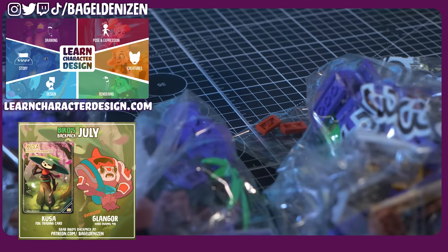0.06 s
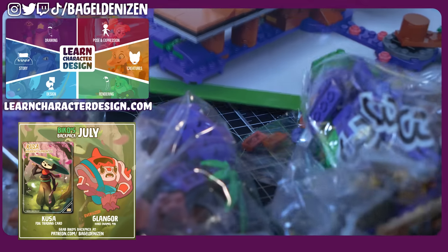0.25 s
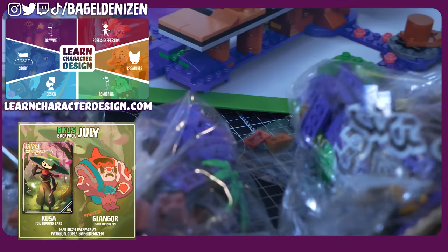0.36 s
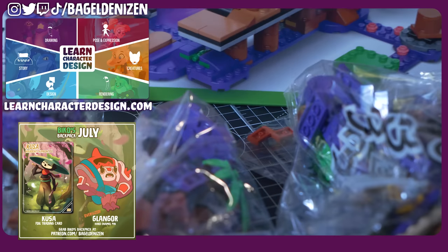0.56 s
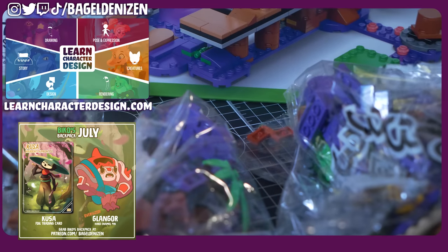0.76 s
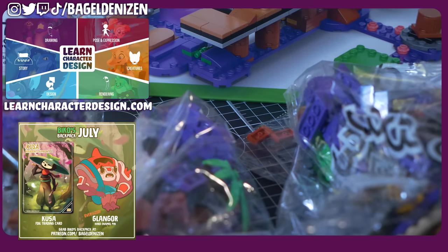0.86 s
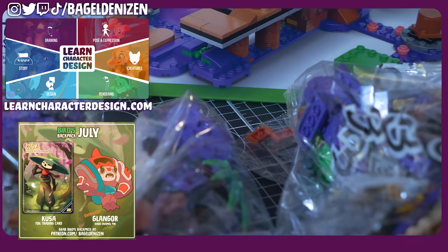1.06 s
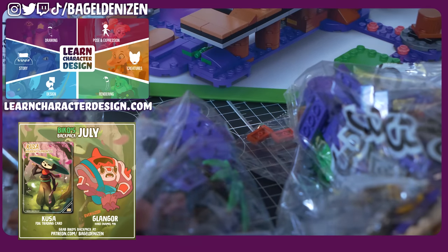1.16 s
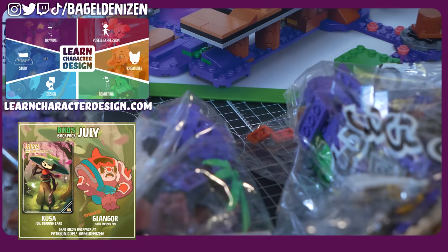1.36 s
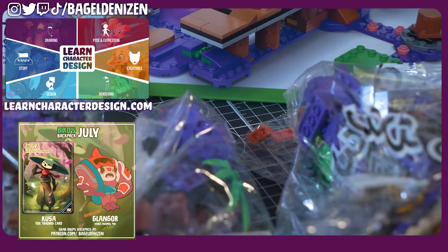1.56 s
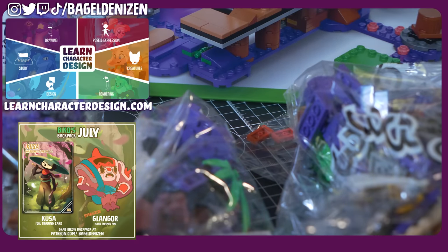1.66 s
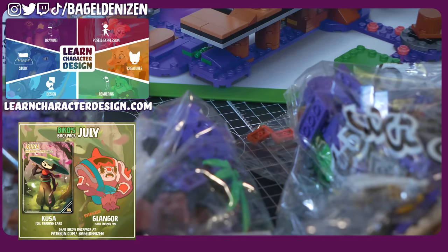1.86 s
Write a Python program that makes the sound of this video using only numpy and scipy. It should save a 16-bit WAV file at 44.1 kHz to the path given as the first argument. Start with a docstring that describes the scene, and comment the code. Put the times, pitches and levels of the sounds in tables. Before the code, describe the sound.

A sealed bag of plastic toy bricks drops on a table, close in a small room. Faint cloth rustle leads to a loud, slightly overloaded double thump and clatter at 0.23 seconds. Crinkles and clicks thin out, then the bag slumps softly around 0.6 and crisply at 0.82. Faint lone ticks at 1.14, 1.22 and 1.5 precede soft rustling and small ticks from 1.8.

```python
"""Close stereo microphone in a small room: hands and cloth rustle softly, then a sealed plastic bag of toy bricks
drops on a table. The top booms as pushes and knocks ring its modes; the film crinkles as a hail of noise cracks,
and bricks and film click as single cracks through ringing colours. The bag slumps twice and settles with lone
two-ringed ticks until a hand takes hold again. Room tone is steady coloured noise; loud peaks overload softly."""
import sys
import numpy as np
from scipy import signal
from scipy.fft import rfft, irfft
from scipy.io import wavfile
from scipy.ndimage import uniform_filter1d

SR = 44100
rng = np.random.default_rng(int(sys.argv[2]) if len(sys.argv) > 2 else 0)


def generate_wav(sig):
    """Save sig (samples, or channels by samples) to the path in sys.argv[1] as 16-bit PCM at SR."""
    pcm = np.round(np.clip(np.atleast_2d(sig).T, -1, 1) * 32767).astype(np.int16)
    wavfile.write(sys.argv[1], SR, pcm)


def level_to_linear(level):
    """Convert decibel levels to linear amplitude factors, elementwise."""
    exponent = np.asarray(level, float) / 20
    return 10 ** exponent


N = 83790  # samples, 1.9 s

# room tone: pitch_hz, relative density_db (per Hz)
AIR_COLOUR = [(40, -25.5), (160, -2), (1550, -1.5), (2200, -14.5), (3700, -14), (16000, -16.5)]
AIR_DB = -65
# strength of hands and cloth nearby: time_s, relative level_db
RUSTLE = [(0, -58), (.1, -54), (.2, -58), (1.45, -72), (1.6, -60), (1.76, -53.5), (1.9, -47)]
# colour of that rustle: pitch_hz, relative density_db (per Hz)
RUSTLE_COLOUR = [(60, -38.5), (250, -6.5), (1100, -1.5), (2500, -10.5), (5000, -19.5), (16000, -36)]
# decay of the small room: pitch_hz, t60_s
ROOM_DECAY = [(300, 0.26), (5000, 0.49), (14000, 0.12)]
ROOM_DB, ROOM_SIDE_DB, ROOM_RISE_S = -8.5, -8.5, 0.0073
WIDE_HZ, WIDE_DB = 10500, 8.5  # above this the two capsules hear the room differently
# where the bag and rustle sit: time_s, left_minus_right_db
PLACE = [(0, -6.5), (.2, -0.5), (1, -3.5)]
TABLE_PLACE_DB = 1.5  # left minus right
# modes of the table top: pitch_hz, relative level_db
TABLE_MODES = [(167, -17), (243, -4.5), (312, 2), (387, -2), (533, 0.5), (577, 3), (634, 5), (933, -7.5),
               (1045, -0.5), (1335, 1.5)]
TABLE_T60_S = 0.047  # at 500 Hz
# bag and heavy clumps landing: time_s, relative level_db, favoured_mode_hz
BLOWS = [(0.229, 6.5, 690), (0.242, 9.5, 440), (0.278, -5.5, 600), (0.333, -5, 600), (0.63, -27.5, 318),
         (0.654, -13.5, 235), (0.685, -18.5, 450), (0.722, -25, 570), (1.137, -42, 601),
         (1.593, -50.5, 400)]
BLOW_DB = -5.5  # added to every blow
CONTACT_S, SPOT_DB = 0.00028, -11.5  # width of the push; loss one octave from the favoured modes
# how hard the bag moves: time_s, relative crinkle_db, relative tumbling_db
MOTION = [(.216, -67, -54), (.22, -29.5, -11), (.24, -16, 0), (.28, -27.5, -16), (.34, -37, -30),
          (.52, -46, -39.5), (.578, -43.5, -37.5), (.59, -35, -47), (.65, -38.5, -46), (.74, -50.5, -40.5),
          (.812, -49, -56.5), (.825, -30.5, -49), (.885, -36.5, -48.5), (.91, -80, -64.5),
          (1.134, -93, -81), (1.142, -60, -58), (1.2, -80, -86), (1.833, -70.5, -70.5), (1.842, -42.5, -66),
          (1.9, -57, -50)]
TUMBLE_DB, TUMBLE_SCATTER_DB = 2.5, 3
CRINKLE_DB, CRINKLE_SCATTER_DB = 3, 4
# colour of the rings of bricks and film: pitch_hz, relative level_db
PLASTIC = [(400, -17), (1300, 0.5), (4000, -5.5), (7000, -6), (10000, -4), (14000, -8.5), (16500, -31)]
# clear clicks of bricks and snaps of film: start_s, relative level_db, strongest_ring_hz
CLICKS = [(0.23, -7, 4000), (0.268, 2.5, 2950), (.376, -11, 5100), (.4004, -13, 2090), (0.4704, -19, 11900),
          (0.5273, -19, 7000), (0.5599, -15.5, 3600), (0.5832, -5.5, 4100), (0.5933, -12, 9500),
          (0.604, -12.5, 4870), (0.613, -20, 8000), (0.6367, -16.5, 5670), (0.6436, -21.5, 8850),
          (0.6886, -15.5, 5070), (0.7473, -20.5, 8640), (0.7601, -14, 1694), (0.7715, -16, 5840),
          (.819, -10, 4540), (0.8314, -11, 9450), (.856, -12, 3580), (0.8619, -12, 4430),
          (0.8787, -15, 8550), (0.8912, -15.5, 4150), (1, -34.5, 1875), (1.7305, -41.5, 4540)]
CLICK_DB, CLICK_MS, CLICK_RING_DB = -4.5, 0.98, 11.5
# duller ticks of single bricks: start_s, relative level_db, low_ring_hz, high_ring_hz, slope_db_per_octave (3-12 kHz)
TICKS = [(0.137, -36.5, 1763, 2292, -11), (1.137, -25, 1220, 2250, -2), (1.219, -29.5, 1221, 2700, -13),
         (1.2364, -48.5, 1250, 2550, -11), (1.522, -27, 1446, 9790, -11.5),
         (1.8364, -25.5, 1494, 2550, -15), (1.8402, -19, 1890, 2582, -5),
         (1.8459, -24.5, 1660, 2478, -11.5), (1.864, -23.5, 3008, 4380, -11)]
TICK_DB, TICK_MS, TICK_RING_DB, TICK_OCTAVES = -5, 1, 12.5, 0.12
# upper rings that all ticking bricks share: pitch_hz
BRICK_HZ = [3620, 5040, 7000]
BRICK_DB = 7.5
SIZE = 512  # samples in one crack
GRID = np.fft.rfftfreq(SIZE, 1 / SR) + 1  # Hz, kept above zero for logarithms


def curve(rows, col, t):
    """Straight lines between the rows of a table."""
    rows = np.array(rows, float)
    return np.interp(t, rows[:, 0], rows[:, col])


def tone(rows, hz):
    """Value of a spectrum, straight on a log frequency axis."""
    rows = np.array(rows, float)
    return np.interp(np.log(np.maximum(hz, 1)), np.log(rows[:, 0]), rows[:, 1])


def set_rms(x, db):
    """Scale to a given rms."""
    return x * level_to_linear(db) / np.sqrt(np.mean(x ** 2))


def noise(colour):
    """Steady noise of a given colour, rms 1."""
    spectrum = rfft(rng.standard_normal(N))
    weight = level_to_linear(tone(colour, np.fft.rfftfreq(N, 1 / SR)))
    return set_rms(irfft(spectrum * weight, N), 0)


def wide_noise(colour, side_gain):
    """Noise common to both channels plus a weaker part of opposite sign in each."""
    return noise(colour) + side_gain * noise(colour) * np.array([[1], [-1]])


def pan(x, db):
    """Place a sound by the level difference between the channels."""
    return np.array([x * level_to_linear(db / 2), x * level_to_linear(-db / 2)])


def air():
    """Room tone: steady, fairly wide coloured noise."""
    return level_to_linear(AIR_DB) * wide_noise(AIR_COLOUR, 0.5)


def rustle(t, place):
    """Hands and cloth rub softly: coloured noise that swells with their strength."""
    return level_to_linear(curve(RUSTLE, 1, t)) * wide_noise(RUSTLE_COLOUR, 0.25) * pan(0.91, place)


def room(x):
    """Reflections as noise decaying octave by octave, mostly alike in both channels."""
    t = np.arange(SR // 2) / SR
    tail = 0
    for hz in 125 * 2. ** np.arange(8):
        edges = [hz / 2 ** .5, min(hz * 2 ** .5, SR * .45)]
        octave = signal.butter(2, edges, "band", fs=SR, output="sos")
        decay = np.exp(-np.log(1000) * t / tone(ROOM_DECAY, hz))
        tail = tail + signal.sosfilt(octave, rng.standard_normal((2, len(t)))) * decay
    tail = tail * np.clip(t / ROOM_RISE_S, 0, 1)
    tail = tail / np.sqrt(np.sum(tail[0] ** 2))
    mid, side = signal.fftconvolve(x[None], tail, axes=1)[:, :N]
    treble = signal.butter(4, WIDE_HZ, "high", fs=SR, output="sos")
    side = side + level_to_linear(WIDE_DB) * signal.sosfilt(treble, side)
    return level_to_linear(ROOM_DB) * (mid + level_to_linear(ROOM_SIDE_DB) * side * np.array([[1], [-1]]))


def table_modes(force):
    """Damped resonances of the table top, each driven by its own row of force."""
    out = 0
    for (hz, db), mode_force in zip(TABLE_MODES, force):
        t60_s = TABLE_T60_S * (500 / hz) ** 0.73  # higher modes die sooner
        radius = np.exp(-np.log(1000) / (t60_s * SR))
        angle = 2 * np.pi * hz / SR
        poles = [1, -2 * radius * np.cos(angle), radius ** 2]
        out = out + level_to_linear(db) * signal.lfilter([.5, 0, -.5], poles, mode_force)
    return out


def blows(t):
    """The bag and heavy clumps land as soft pushes, favouring the modes of the spot they hit."""
    force = np.zeros((len(TABLE_MODES), N))
    polarity = (-1) ** np.arange(len(TABLE_MODES))
    for at, db, hz in BLOWS:
        spot = level_to_linear(SPOT_DB * np.log2(np.array(TABLE_MODES)[:, 0] / hz) ** 2)
        push = np.exp(-.5 * ((t - at) / CONTACT_S) ** 2)
        force += level_to_linear(db + BLOW_DB) * np.outer(spot * polarity, push / push.sum())
    return force


def tumbling(t):
    """Many small knocks of bricks, random in time and strength, as strong as the bag's motion."""
    knocks = np.zeros((len(TABLE_MODES), N))
    chance = rng.random((600, 2))
    where = ((.21 + 1.68 * chance[:, 0]) * SR).astype(int)
    strength = level_to_linear(-TUMBLE_SCATTER_DB * np.log(1 - chance[:, 1:]))
    knocks[:, where] = (rng.standard_normal((len(chance), len(TABLE_MODES))) * strength).T
    # level is set by the rms of the ringing top, before the motion shapes it
    scale = level_to_linear(TUMBLE_DB) / np.sqrt(np.mean(table_modes(knocks) ** 2))
    return scale * knocks * level_to_linear(curve(MOTION, 2, t))


def table(t):
    """The table top booms under the landing bag and the tumbling bricks."""
    return table_modes(blows(t) + tumbling(t))


def ring(hz, db, octaves):
    """A resonant bump on the colour of plastic, one row for each pitch."""
    return db * np.exp(-.5 * (np.log2(GRID / hz[:, None]) / octaves) ** 2)


def bursts(at, db, colour_db, ms):
    """Short noise cracks evened in spectrum, each dying with time constant ms and then ringing in its own colour."""
    t_ms = np.arange(SIZE) / SR * 1000
    envelope = np.exp(-t_ms / ms) * np.clip(t_ms / 0.2, 0, 1)
    crack = rfft(rng.standard_normal((len(at), SIZE)) * envelope)
    crack = crack / uniform_filter1d(np.abs(crack), size=7, axis=1)
    # folding the cepstrum makes the colour causal (minimum phase)
    fold = np.r_[1, 2 * np.ones(SIZE // 2 - 1), 1, np.zeros(SIZE // 2 - 1)]
    cepstrum = irfft(np.log(level_to_linear(colour_db)), SIZE) * fold
    fade = np.hanning(2 * SIZE)[SIZE:] ** 2
    wave = irfft(crack * np.exp(rfft(cepstrum)), SIZE) * fade
    energy = np.sum(wave ** 2, axis=1, keepdims=True)
    wave = wave * level_to_linear(db)[:, None] / np.sqrt(energy / (ms / 1000 * SR))
    where = (at * SR).astype(int)[:, None] + np.arange(SIZE)
    return np.bincount(where.ravel(), wave.ravel(), N + SIZE)[:N]


def crinkle(t):
    """The film crinkles: a dense hail of tiny snaps, as strong as the bag's motion."""
    at, size, pitch = rng.random((2200, 3)).T
    size_db = np.minimum(-CRINKLE_SCATTER_DB * np.log(1 - size), 12)
    colour = tone(PLASTIC, GRID) + ring(1200 * 10 ** pitch, 12.1, 0.25)
    hail = bursts(.2 + 1.7 * at, size_db, colour, 1.0)
    return set_rms(hail, CRINKLE_DB) * level_to_linear(curve(MOTION, 1, t))


def ticks():
    """Single bricks tick: dull cracks with two rings of their own and the upper rings all share."""
    at, db, low, high, slope = np.array(TICKS, float).T
    colour = tone(PLASTIC, GRID) + slope[:, None] * np.clip(np.log2(GRID / 3000), 0, 2)
    colour = colour + ring(np.array(BRICK_HZ, float), BRICK_DB, TICK_OCTAVES / 2).sum(axis=0)
    colour = colour + ring(low, TICK_RING_DB, TICK_OCTAVES) + ring(high, TICK_RING_DB, TICK_OCTAVES)
    return bursts(at, db + TICK_DB, colour, TICK_MS)


def clicks():
    """Bricks click and film snaps: bright broad cracks, each with one strongest ring."""
    at, db, hz = np.array(CLICKS, float).T
    colour = tone(PLASTIC, GRID) + ring(hz, CLICK_RING_DB, 0.2)
    return bursts(at, db + CLICK_DB, colour, CLICK_MS)


def scene():
    """Room tone, rustle, table and bag, close up and through the room."""
    t = np.arange(N) / SR
    place = curve(PLACE, 1, t)
    bag = clicks() + ticks() + crinkle(t)
    boom = table(t)
    direct = pan(bag, place) + pan(boom, TABLE_PLACE_DB)
    return direct + room(bag + 0.41 * boom) + rustle(t, place) + air()


def top_cut(x):
    """Nothing passes above the cut-off."""
    return signal.sosfilt(signal.butter(12, 16440, fs=SR, output="sos"), x)


def record(dry):
    """The microphone overloads softly toward a ceiling, then the bass is cut."""
    ceiling, low_cut_hz = 0.66, 123
    x = dry / (1 + np.abs(dry / ceiling) ** 4) ** (1 / 4)
    x = signal.sosfilt(signal.butter(3, low_cut_hz, "high", fs=SR, output="sos"), x)
    mix = np.clip(x, -1, 1)
    return top_cut(mix)


dry = scene()
out = record(dry)
generate_wav(out)
```